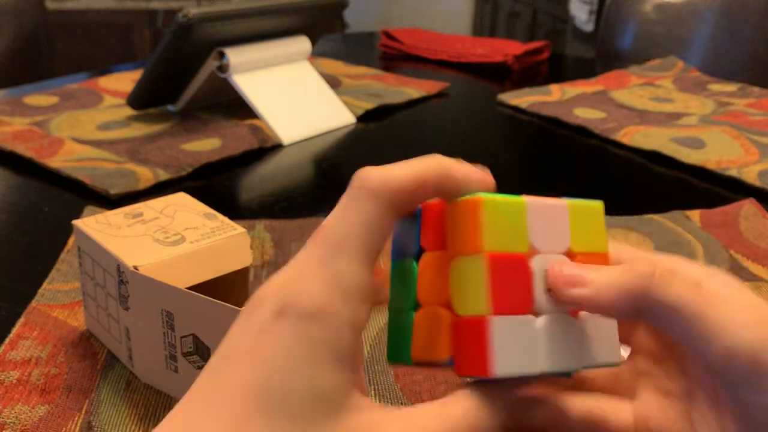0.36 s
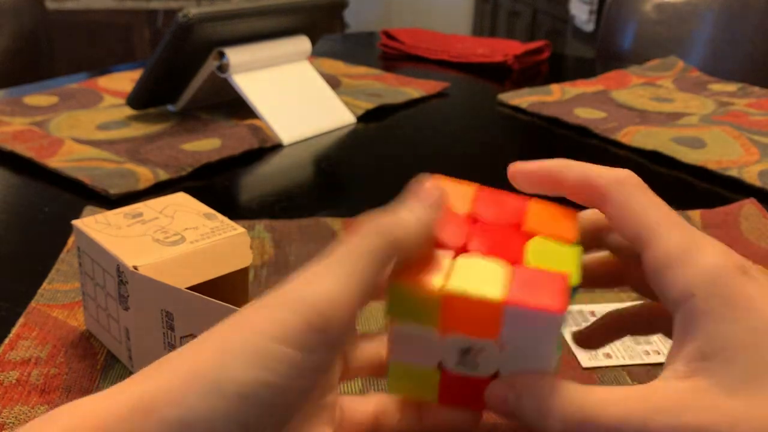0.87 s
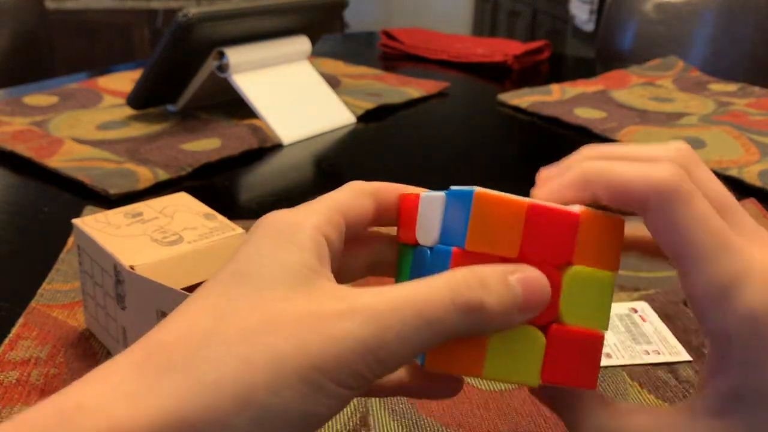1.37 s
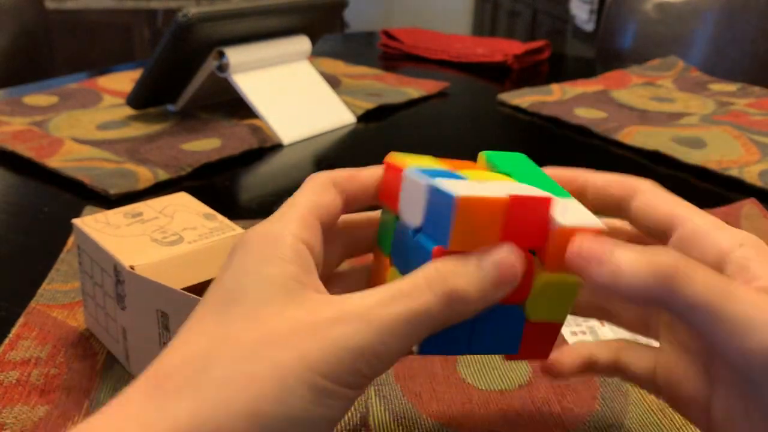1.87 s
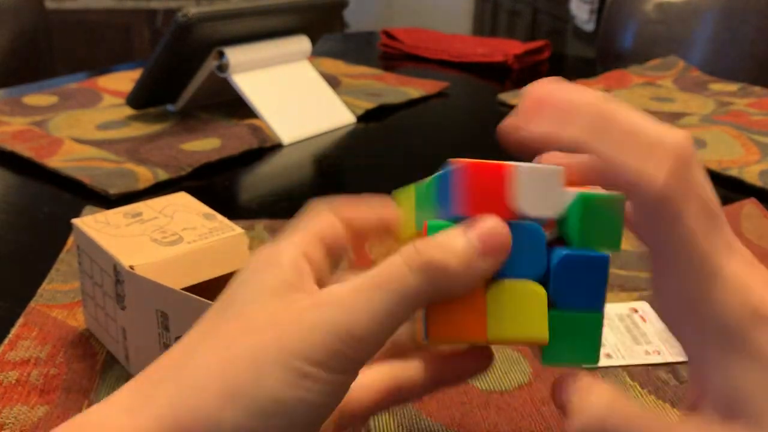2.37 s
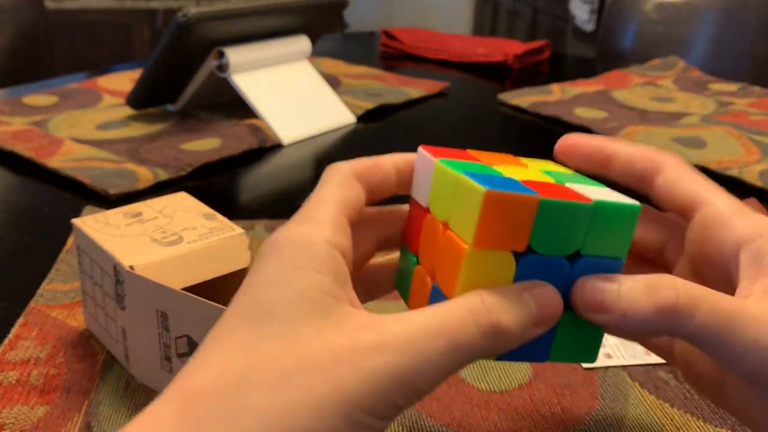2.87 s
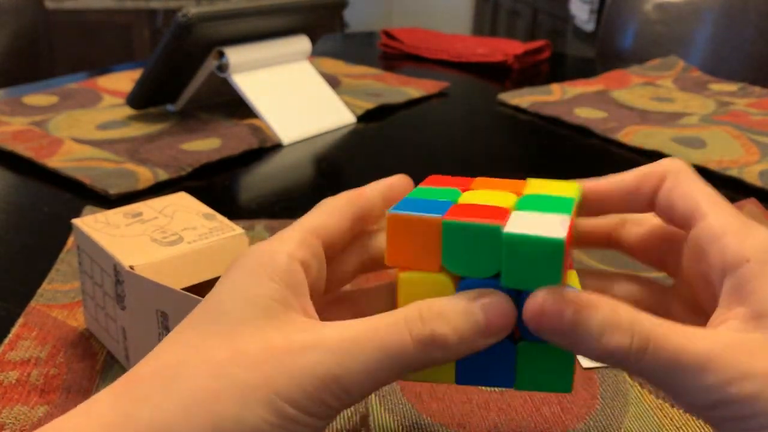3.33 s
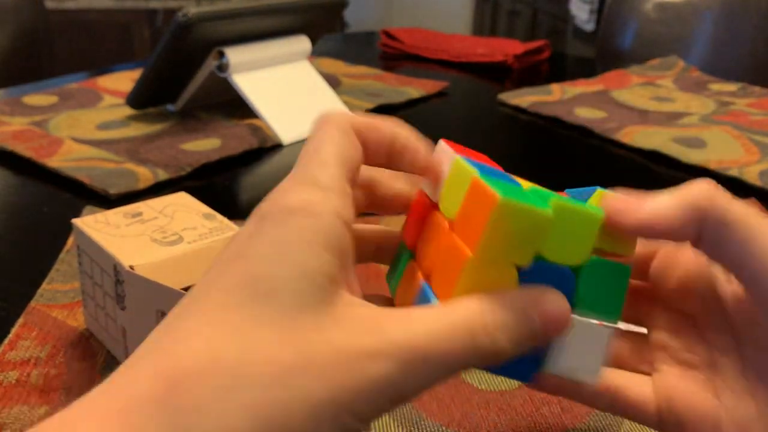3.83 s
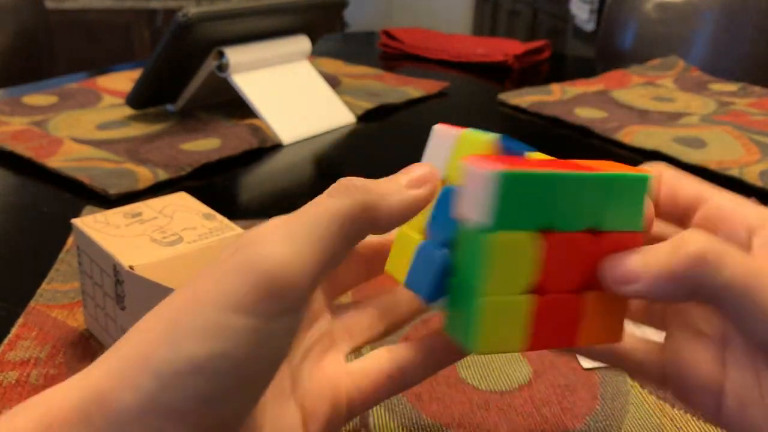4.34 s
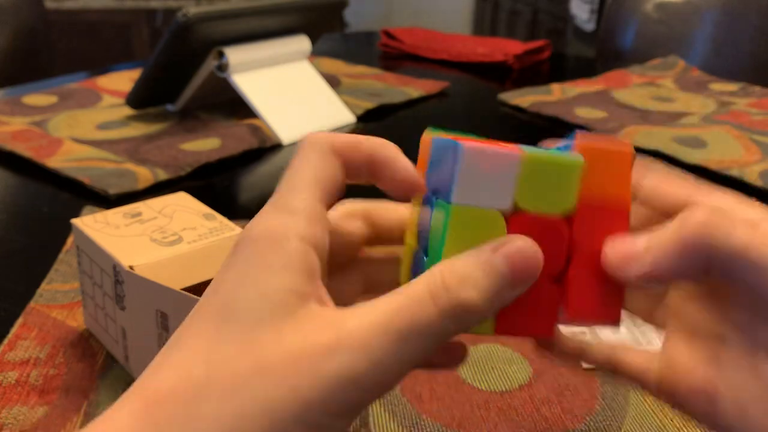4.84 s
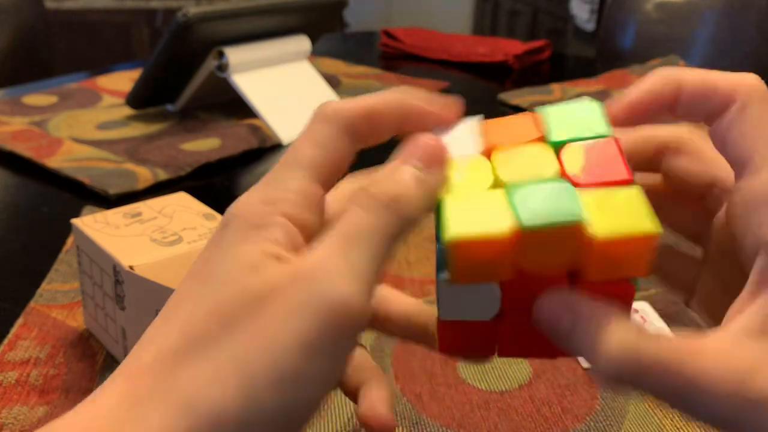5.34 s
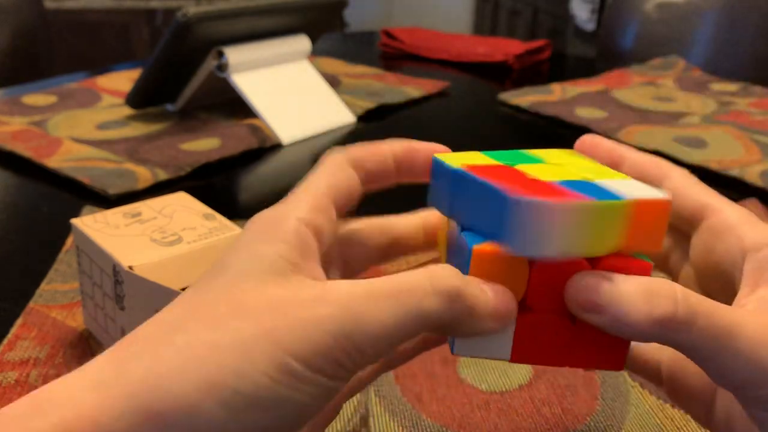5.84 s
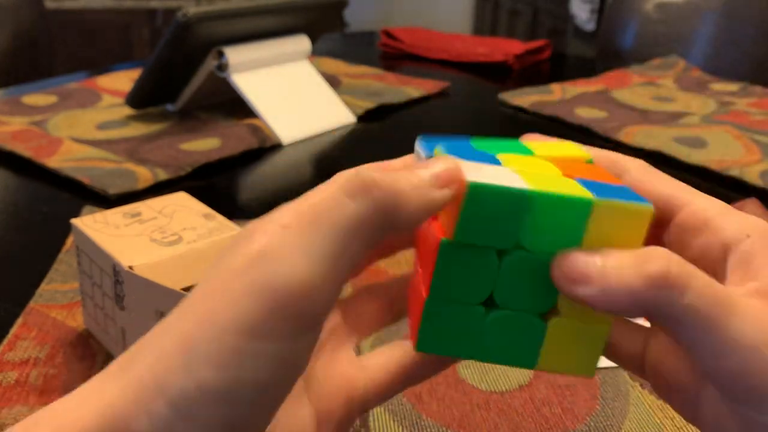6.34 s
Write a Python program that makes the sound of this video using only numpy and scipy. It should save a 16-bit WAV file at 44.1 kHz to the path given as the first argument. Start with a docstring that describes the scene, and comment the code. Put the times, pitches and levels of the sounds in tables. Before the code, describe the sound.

Rapid hand turns of a plastic twisting puzzle: sharp thin clacks, short dry slides and brief pauses in a quiet small room.

```python
"""Plastic puzzle cube twisted by hand close to a microphone: clicks ring brightly and excite hollow-body modes.
Gritty sliding, made of dense shaped grains, swells with each turn; soft low knocks are decaying sines.
Room: sparse-tap tail, shaped-noise hum with fuzzy low tones. Faint steady filtered hiss on top.
Sound below about 8 kHz is muffled by a filter, except for a few stretches where it opens up."""
import sys
import numpy as np
from scipy import signal
from scipy.fft import rfft, irfft
from scipy.io import wavfile
from scipy.ndimage import uniform_filter1d

SR = 44100
rng = np.random.default_rng(int(sys.argv[2]) if len(sys.argv) > 2 else 0)


def elevation(decibels):
    """Turn decibel levels (scalar or array-like) into linear amplitude ratios."""
    levels = np.asarray(decibels, float)
    return 10 ** (levels / 20)


def transcribe(signal):
    """Save signal, clipped to [-1, 1], as a 16-bit WAV file at the path in sys.argv[1]."""
    frames = np.atleast_2d(signal).T
    limited = np.clip(frames, -1, 1)
    pcm = np.round(limited * 32767).astype(np.int16)
    wavfile.write(sys.argv[1], SR, pcm)


N = 295470
HZ = np.fft.rfftfreq(N, 1 / SR)
T_S = np.arange(N) / SR

# pieces snapping past each other, the ones that stand out: t/s, relative peak/dB, hollow body re ring/dB
CLICKS = [(0.2027, -59, 1), (0.372, -55.5, 8), (0.3829, -52.5, 15.5), (0.4023, -57, -14), (0.5, -27.5, 5),
          (0.5675, -50.5, 11), (0.6334, -57, 13), (1.1129, -37.5, 4.5), (1.1428, -45, 9),
          (1.1894, -32, -21), (1.2898, -38, -17), (1.5675, -38, 1.5), (1.6036, -18, 3.5),
          (1.6086, -7.5, -4.5), (1.6194, -5, -5.5), (1.676, -19, -16.5), (1.6907, -9, 3),
          (1.7028, -21.5, 7), (1.7145, -12.5, 2.5), (1.7231, -7.5, -12.5), (1.741, -26.5, 4.5),
          (1.915, -36, 6), (1.9365, -36.5, 7.5), (2.0354, -42.5, 2), (2.2035, -42, 13), (2.2981, -22, 10),
          (2.3192, -16, 4), (2.337, -19, -4), (2.3561, -26.5, 8), (2.3681, -22, -5.5), (2.449, -20, -7),
          (2.455, -17.5, 3), (2.542, -43.5, -7), (2.6169, -30.5, -4), (2.6318, -18.5, -2.5),
          (2.664, -21, -10), (2.669, -18, -19), (2.674, -9.5, -7.5), (2.6815, -19, -3), (2.7329, -22, -12),
          (2.7504, -21, -7), (2.7549, -13.5, -10), (2.7642, -30, -15), (3.121, -70, 16),
          (3.2701, -52.5, 9.5), (3.3394, -42.5, 5.5), (3.4078, -23, 5.5), (3.4195, -18, 1.5),
          (3.4301, -13.5, 1), (3.5086, -27, -3), (3.5324, -23.5, 4.5), (3.5626, -8, -9.5),
          (3.5931, -9.5, -4), (3.5969, -13, -3), (3.6699, -19.5, -1), (3.7764, -13.5, -11.5),
          (3.7795, -12.5, -20), (3.7907, -13, -5), (3.8128, -10, -16), (3.8954, -22, -4),
          (3.9028, -9, -6.5), (4.0185, -38, -5), (4.0904, -14.5, 1), (4.1013, -9.5, -5), (4.1483, -32, 10),
          (4.1613, -20, 1), (4.166, -23.5, 8.5), (4.2755, -34.5, 8.5), (4.416, -42, 9),
          (4.4431, -46.5, 8.5), (4.5531, -29.5, 1.5), (4.581, -42, 9.5), (4.6026, -31, 1.5),
          (4.616, -45.5, 9), (4.6639, -40, 9), (4.6828, -22, 7), (4.733, -29, 2), (4.762, -22, 8),
          (4.7771, -13.5, -1.5), (4.7948, -24, -24), (4.8465, -22.5, 6), (4.8773, -24.5, 4),
          (4.8816, -18, 1.5), (5.0423, -51.5, 17.5), (5.1846, -26.5, -16), (5.2168, -22, 5),
          (5.2916, -30.5, 0), (5.3248, -25, 7.5), (5.3464, -24, 11), (5.395, -20.5, 7), (5.4739, -12.5, -4),
          (5.4779, -14, 4), (5.5511, -16, 6.5), (5.5847, -19, 5.5), (5.6409, -12, -5.5), (5.6595, -20, 6.5),
          (5.7571, -32, 2.5), (5.7675, -28, -11.5), (5.8486, -55.5, 22.5), (5.8867, -31.5, -9),
          (5.912, -9.5, 0), (5.9228, -21, -10), (5.9878, -14.5, -0.5), (5.997, -17.5, 3.5),
          (6.0266, -10, -1.5), (6.0377, -11, -3), (6.0962, -24, -9.5), (6.3057, -46, 17),
          (6.3844, -39, 5.5), (6.493, -34, 15), (6.5369, -10, 5.5), (6.5495, -19.5, 15),
          (6.6643, -28.5, 7.5), (6.6987, -20, -6)]
# face turns and finger shifts: start/s, length/s, relative level/dB, hollow body re bright part/dB
TURNS = [(0.277, .015, -75, 14.5), (0.369, .08, -65, 0), (0.49, .03, -68.5, -3), (0.743, 0.036, -68, -5),
         (0.927, 0.032, -63.5, -17), (1.105, 0.1, -63.5, 1.5), (1.217, 0.066, -71, 7),
         (1.5, 0.073, -91, 15.5), (1.553, .04, -80.5, 12.5), (1.598, 0.0093, -43.5, 5),
         (1.685, 0.048, -32, 1.5), (1.907, 0.053, -56, 5), (2.06, .04, -62.5, -4), (2.2, 0.1, -60.5, 8),
         (2.271, 0.11, -48, 9), (2.427, 0.056, -48.5, 5.5), (2.592, .04, -55.5, 3), (2.661, 0.038, -37, -5),
         (2.742, 0.016, -41.5, -4), (2.808, .2, -81.5, 22), (3.175, 0.044, -72.5, 5),
         (3.322, 0.029, -64, 2), (3.407, 0.016, -44.5, 2.5), (3.503, 0.053, -48, 6.5),
         (3.547, 0.03, -38, -4.5), (3.637, 0.057, -45, 5.5), (3.774, 0.044, -40.5, -7),
         (3.895, 0.023, -47, -11), (4.056, 0.058, -46, 1), (4.143, .04, -43.5, 2), (4.409, 0.036, -78, 4.5),
         (4.53, 0.075, -54.5, 4.5), (4.662, 0.014, -51, 3), (4.695, .11, -44, -2), (4.84, 0.06, -47.5, 9),
         (5.119, 0.036, -68, 6), (5.186, 0.052, -45, 0.5), (5.296, 0.043, -51.5, 10.5),
         (5.377, 0.018, -50.5, 19.5), (5.472, 0.015, -38.5, 11.5), (5.534, 0.035, -50, 9),
         (5.625, 0.036, -41.5, 8), (5.751, 0.018, -57, 4.5), (5.886, 0.056, -41.5, 0.5),
         (5.977, 0.074, -41, 6), (6.078, 0.053, -44.5, -2.5), (6.309, .02, -68.5, 17),
         (6.378, 0.041, -62.5, 6.5), (6.487, 0.031, -61.5, 9), (6.535, 0.011, -38, 8),
         (6.65, 0.07, -59.5, 19)]
# soft knocks through hands and table: t/s, relative level/dB, f/Hz
THUMPS = [(.36, -50.5, 307), (.483, -59, 65.3), (1.24, -52.5, 66), (1.605, -50.5, 67), (2.683, -53.5, 95.8),
          (3.1, -60, 34), (3.425, -43.5, 66), (3.606, -52.5, 66), (3.823, -54, 62.4), (4.121, -57, 66),
          (4.535, -55, 49.6), (5.859, -54, 94.7), (6.54, -54, 62)]
# modes of the hollow pieces: f/Hz, width/Hz, relative level/dB (clicks only)
BODY_MODES = [(1240, 120, -23.5), (2113, 210, 6), (3180, 1000, 4), (4570, 1200, -2.5), (5075, 2600, 13),
              (7300, 420, 1.5)]
# colour of grit and click ring: f/Hz, relative level/dB
GRIT_COLOUR = [(600, -45.5), (1000, 5), (2300, 3), (6000, 0), (8300, -2), (9700, -1), (12500, -6.5),
               (14500, -8.5), (15600, -9)]
# decay of the room tail: f/Hz, t60/s
ROOM_T60 = [(1000, 0.18), (9000, 0.29), (15000, 0.084)]
# spectrum of the broad room tone: f/Hz, relative density/dB
HUM_COLOUR = [(20, -3), (60, -3.5), (200, 3.5), (400, -6.5), (500, -13), (620, -18), (800, -31.5),
              (1300, -20), (2000, -43), (8000, -49.5), (16000, -60)]
# fuzzy tones in the hum: f/Hz, width/Hz, relative level/dB
HUM_TONES = [(66, 180, -82.5), (244.2, 2.8, -66), (358.3, 19, -67), (392.8, 7.7, -68), (438.7, 7, -66.5),
             (473, 7.8, -70), (1130, 40, -78.5)]
# spectrum of the hiss: f/Hz, relative density/dB
HISS_COLOUR = [(500, -0.5), (900, -6), (1300, -2.5), (2500, -6), (7500, -11.5), (8600, -6.5),
               (16000, -18.5)]
# phase between the microphone ports: f/Hz, lead of right/rad
PORT_LEAD = [(0, 0), (1900, 0.51), (2900, -2.5), (5500, -1), (7900, 0.37), (15200, 12), (22050, 10)]
# likeness of the ports: f/Hz, share/1
PORT_LIKENESS = [(500, 0.89), (1500, 0.67), (7000, 0.21), (8200, 0.98)]
# muffling filter: f/Hz, gain/dB
MUFFLE = [(30, -12), (80, -7.5), (200, -28), (1000, -31), (7800, -23.5), (8060, 2.5), (20000, -0.5)]
# stretches in which the muffling lifts: start/s, end/s, unmuffled share/dB
OPENINGS = [(.05, 0.253, -24), (0.24, 0.389, -15), (0.858, 1.621, -2), (2.866, 3.08, -26),
            (3.084, 3.452, -2), (4.524, 4.683, -1), (5.125, 5.198, -2), (5.851, 5.941, 1)]
# top of the band: f/Hz, gain/dB
BAND_EDGE = [(15700, 0), (16000, -19.5), (17200, -83)]

SPLIT_HZ = 8000  # hollow body below, bright part above
RISE_DB_PER_S, FALL_DB_PER_S = 1301, 479.5
GRIP_DB, GRIP_BODY_DB = -93.5, 4.5  # fingers rest on the faces between turns
SMALL_PER_S = 45
SMALL_DB, SMALL_SPREAD_DB = 7, 12.5  # small snaps: least level over the sliding, range above it
SMALL_BODY_DB, SMALL_BODY_SPREAD_DB = -5, 12  # mean, deviation either way
OPEN_FADE_S, LEAK_DB = 0.0098, -32.5


def evened(x):
    """Scales to rms 1 over all channels."""
    return x / np.sqrt(np.mean(x ** 2) + 1e-20)


def read(points, hz):
    """Interpolates a curve on a log-frequency axis."""
    f, value = np.transpose(points)
    return np.interp(np.log(hz + 1), np.log(f + 1), value)


def peak(hz, centre_hz, width_hz):
    """Complex response of one resonance, 1 at its centre."""
    return 1 / (1 + 2j * (hz - centre_hz) / width_hz)


def add(mix, s, sound):
    """Mixes a sound in at s seconds."""
    part = mix[..., max(round(s * SR), 0):][..., :sound.shape[-1]]
    part += sound[..., :part.shape[-1]]


def clicks(rows):
    """Each snap is a tiny rattle that excites a bright ring and, unevenly, the modes of the hollow body."""
    size = 1024
    out = np.zeros((2, N))
    t, hz = np.arange(size) / SR, np.fft.rfftfreq(size, 1 / SR)
    body_band = np.minimum(hz / 1000, 1) ** 5 * (hz < SPLIT_HZ)
    bright_band = elevation(read(GRIT_COLOUR, hz)) * (hz >= SPLIT_HZ)
    # the edges drag before the snap and chatter after it
    skirt = np.exp(-abs(t - .0085) / np.where(t < .0085, .002, .0025))
    noises = rng.standard_normal((len(rows), 2, size))
    chances = rng.random((len(rows), 2 + len(BODY_MODES)))
    for (s, db, body_db), noise, (colour, length, *share) in zip(rows, noises, chances):
        u = np.maximum(t - .008, 0) / (.0002 + .0004 * length ** 2)
        rattle = rfft(noise * (u ** 2 * np.exp(-u) + 0.22 * skirt))
        ring = irfft(rattle * (peak(hz, 8300 + 4000 * colour ** 2, 2100) + 0.59) * bright_band)
        body = sum(elevation(mode_db + 39 * (k - .5)) * peak(hz, f, width)
                   for (f, width, mode_db), k in zip(BODY_MODES, share))
        knock = irfft(rattle * body * body_band)
        # envelope peak 1 in each channel
        ring, knock = [v / abs(signal.hilbert(v)).max(1, keepdims=True) for v in (ring, knock)]
        snap = ring + elevation(body_db) * knock
        crest_s = abs(snap[0]).argmax() / SR  # loudest instant of the left channel falls on s
        add(out, s - crest_s, elevation(db + 3.0) * snap)
    return out


def small_clicks():
    """Rows like CLICKS at random moments, as loud as the sliding at that moment allows."""
    when, size, hollow = rng.random((round(SMALL_PER_S * N / SR), 3)).T
    slide_db = 20 * np.log10(effort()[0][(when * N).astype(int)])
    level_db = slide_db + SMALL_DB + SMALL_SPREAD_DB * size ** 2
    body_db = SMALL_BODY_DB + SMALL_BODY_SPREAD_DB * 2 * (hollow - .5)
    return list(zip(when * N / SR, level_db, body_db))


def effort():
    """Gains of bright part and body: every turn starts fast, holds and dies away over the resting grip."""
    s, length, db, body_db = np.transpose(TURNS)[:, :, None]
    t = T_S[::64]
    early_s, late_s = np.maximum(s - t, 0), np.maximum(t - s - length, 0)
    turn = elevation(db - RISE_DB_PER_S * early_s - FALL_DB_PER_S * late_s)
    bright = turn.sum(0) + elevation(GRIP_DB)
    body = (turn * elevation(body_db)).sum(0) + elevation(GRIP_DB + GRIP_BODY_DB)
    return [np.interp(T_S, t, gain) for gain in (bright, body)]


def slide():
    """Dense tiny grains of uneven size, in clumps as ridges catch; each grain favours one mode of the body."""
    catch = evened(uniform_filter1d(rng.standard_normal(N), 400))
    size = elevation(4.5 * np.minimum(rng.exponential(1, N), 3) + 3.1 * np.clip(catch, -3, 1.5))
    struck = rng.random(N) < 2500 / SR  # 2500 grains per s on average
    grains = evened(struck * size * rng.standard_normal((2, N)))
    grains += 0.52 * rng.standard_normal((2, N)) * elevation(1.7 * catch)
    colour = elevation(read(GRIT_COLOUR, HZ))
    favoured = rng.integers(0, len(BODY_MODES), N // 256 + 1).repeat(256)[:N]  # one mode per 256 samples
    body = sum(rfft(grains * (favoured == k)) * (0.27 + peak(HZ, f, width))
               for k, (f, width, _) in enumerate(BODY_MODES))
    bright = evened(irfft(rfft(grains) * colour * (HZ >= SPLIT_HZ), N))
    body = evened(irfft(body * colour * (HZ < SPLIT_HZ), N))
    bright_gain, body_gain = effort()
    return bright_gain * bright + body_gain * body


def thumps():
    """A low push: a sine whose envelope swells for 13 ms and then dies away."""
    out, t = np.zeros(N), np.arange(6000) / SR
    envelope = t / 0.032 * np.exp(1 - t / 0.013)
    for s, db, hz in THUMPS:
        add(out, s, elevation(db + 11) * np.sin(2 * np.pi * hz * t) * envelope)
    return out


def room(x):
    """Sparse taps of random sign, each band dying at its own speed."""
    taps = np.zeros((2, SR // 2))
    at = np.arange(130, SR // 2 - 20, 20) + rng.integers(0, 20, (2, (SR // 2 - 131) // 20))
    np.put_along_axis(taps, at, rng.choice([-1., 1.], at.shape), 1)
    hz, t, z = signal.stft(taps, SR, nperseg=256)
    decay = elevation(-60 * t / read(ROOM_T60, hz)[:, None])
    tail = signal.istft(z * decay, SR, nperseg=256)[1]
    return signal.fftconvolve(x, tail / np.linalg.norm(tail[0]), axes=1)[:, :N]


def hum():
    """Broad room tone with a few fuzzy low tones, all filtered from one noise."""
    z = rfft(rng.standard_normal((2, N)))
    broad = elevation(-60) * evened(irfft(z * elevation(read(HUM_COLOUR, HZ)), N))
    tones = sum(elevation(db) * evened(irfft(z * peak(HZ, f, width), N)) for f, width, db in HUM_TONES)
    return broad + tones


def ports(pair):
    """Two channels of one source become what left and right ports hear: partly alike, shifted in phase."""
    a, b = rfft(pair)
    same = np.clip(read(PORT_LIKENESS, HZ), 0, 1)
    lead = np.exp(1j * np.interp(HZ, *np.transpose(PORT_LEAD)))
    return irfft([a, lead * (same * a + np.sqrt(1 - same ** 2) * b)], N)


def hiss():
    """Steady coloured noise at the two ports."""
    z = rfft(ports(rng.standard_normal((2, N))))
    return elevation(-78.5) * evened(irfft(z * elevation(read(HISS_COLOUR, HZ)), N))


def open_share():
    """Share of unmuffled sound over time: a small leak plus linear fades in and out of each opening."""
    lifted = sum(elevation(db) * np.clip(np.minimum(T_S - start, end - T_S) / OPEN_FADE_S + .5, 0, 1)
                 for start, end, db in OPENINGS)
    return np.clip(lifted + elevation(LEAK_DB), 0, 1)


def scene():
    """Cube, its room tail and the hum at the two ports, with the knocks in the middle."""
    cube = clicks(CLICKS + small_clicks()) + slide()
    return ports(cube + elevation(-15.5) * room(cube) + hum()) + thumps()


def band_limit(x):
    """A steep low-pass at the top of the band."""
    return signal.sosfilt(signal.butter(12, 16990, fs=SR, output="sos"), x)


def record(dry):
    """Fades between the muffled and the full sound, adds the hiss and limits the band."""
    muffled = irfft(rfft(dry) * elevation(read(MUFFLE, HZ)), N)
    heard = muffled + open_share() * (dry - muffled) + hiss()
    mix = irfft(rfft(heard) * elevation(read(BAND_EDGE, HZ)), N)
    return band_limit(mix)


dry = scene()
out = record(dry)
transcribe(out)
```